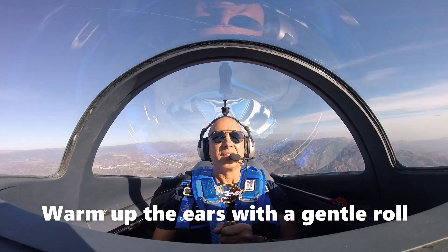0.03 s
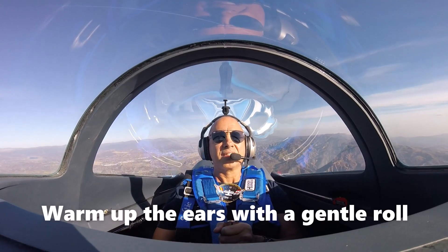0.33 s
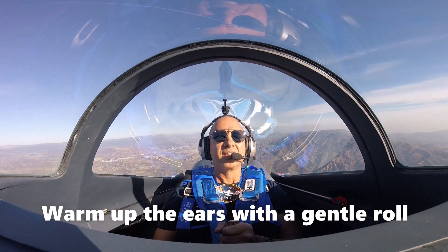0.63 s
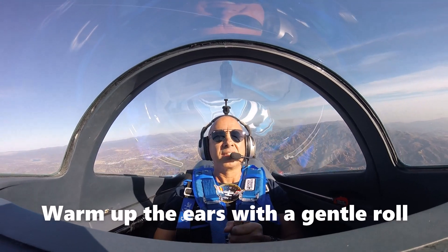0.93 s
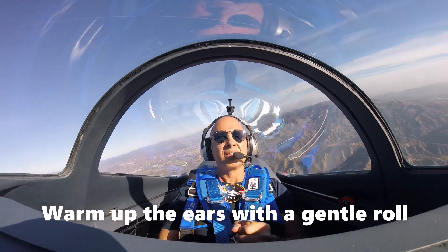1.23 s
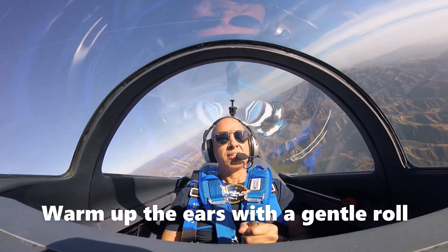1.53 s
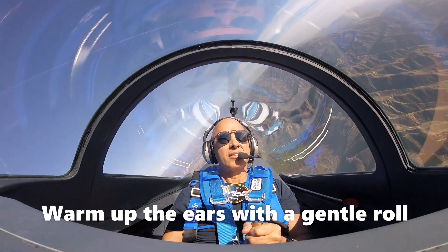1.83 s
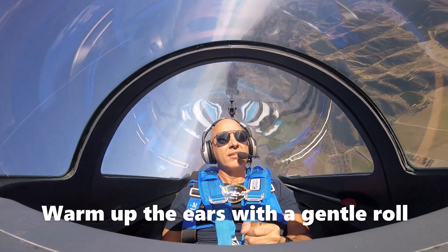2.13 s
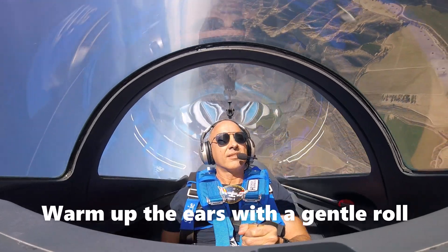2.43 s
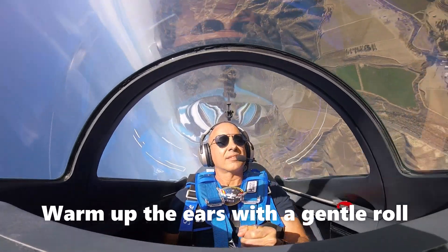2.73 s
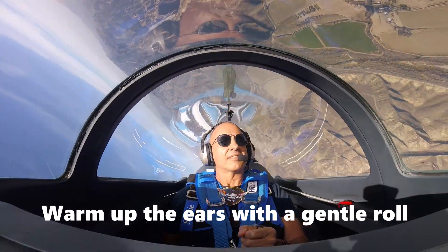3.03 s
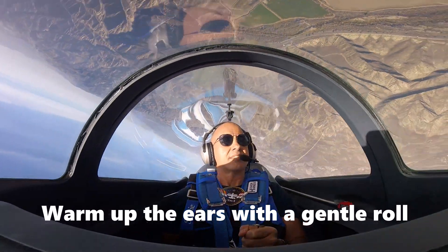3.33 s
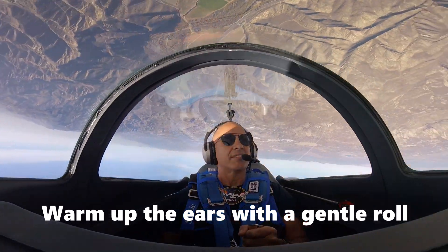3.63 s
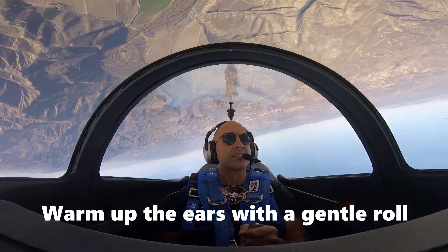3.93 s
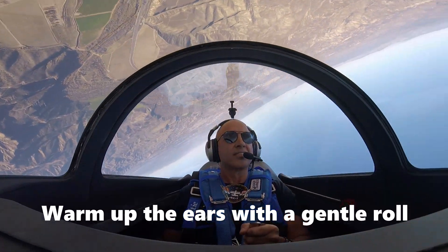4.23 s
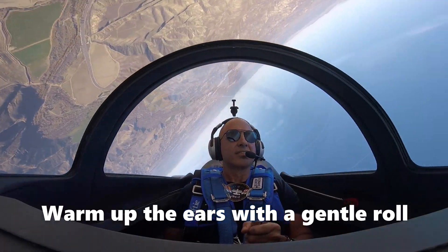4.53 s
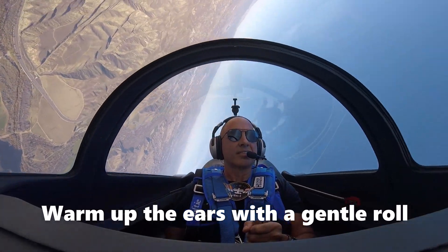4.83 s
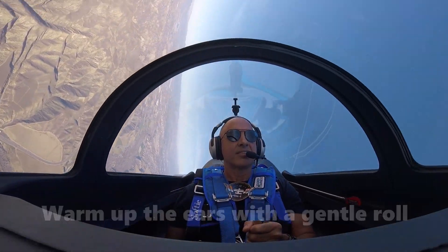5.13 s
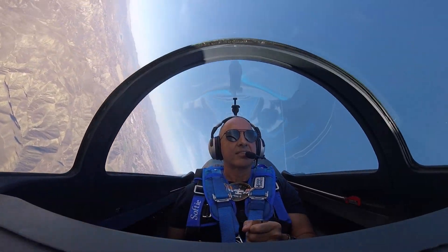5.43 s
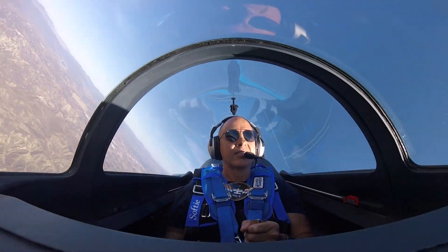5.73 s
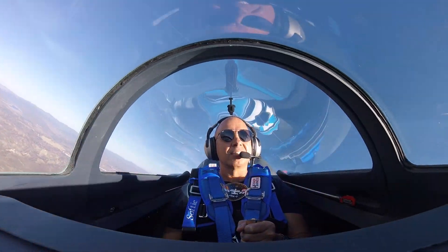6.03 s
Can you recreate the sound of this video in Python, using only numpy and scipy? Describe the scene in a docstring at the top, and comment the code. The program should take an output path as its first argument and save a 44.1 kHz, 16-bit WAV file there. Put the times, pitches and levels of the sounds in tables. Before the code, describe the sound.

Muted propeller plane drone from inside a closed cockpit jumps abruptly to full volume, with cabin rumble and rushing air.

```python
"""First comes a quiet drone, which jumps to full volume with a small click after two seconds.
This is the closed cockpit of a small aerobatic plane in a gentle roll. A six-cylinder engine and a
four-blade propeller make the drone, turning about 42 times a second. Behind them the shaken cabin
booms and air rushes over the canopy. A limiter holds down the loudest peaks."""
import sys
import numpy as np
from scipy import signal
from scipy.fft import rfft, irfft, next_fast_len
from scipy.io import wavfile
from scipy.ndimage import uniform_filter1d, minimum_filter1d

SR = 44100
rng = np.random.default_rng(int(sys.argv[2]) if len(sys.argv) > 2 else 0)


def generate_wav(sig):
    """Save sig (samples, or channels by samples) to the path in sys.argv[1] as 16-bit PCM at SR."""
    pcm = np.round(np.clip(np.atleast_2d(sig).T, -1, 1) * 32767).astype(np.int16)
    wavfile.write(sys.argv[1], SR, pcm)


N = 268569
TIME = np.arange(N) / SR
FIRINGS_PER_TURN, BLADES = 3, 4


def from_db(db):
    """Turn decibels into a number to multiply a sound by."""
    return 10 ** (np.asarray(db) / 20)


def drift(rate):
    """A smooth random wobble, about 1 in size, that changes about rate times a second."""
    step, warm_up = 100, 2000   # samples per slow step, steps thrown away
    memory = np.exp(-2 * np.pi * rate * step / SR)
    noise = rng.standard_normal(N // step + warm_up + 2)
    slow = signal.lfilter([1], [1, -2 * memory, memory ** 2], noise)[warm_up:]
    return np.interp(np.arange(N) / step, np.arange(len(slow)), slow / slow.std())


def tone(cycles, db):
    """A pure tone with an average (rms) level of db, peaking at each whole cycle."""
    return np.sqrt(2) * from_db(db) * np.cos(2 * np.pi * cycles)


# Pitches at which the cabin and canopy ring. Each row: pitch in Hz, width in Hz, boost in dB.
CABIN_RESONANCES = [(108, 26, 6.5), (299.7, 32.2, 9), (397.7, 22, 5.5), (666, 25, 3.5), (704, 17, 2),
                    (812, 22, 5.5), (883, 55, 3), (1150, 31, 1.5), (1760, 27, 1), (2770, 170, 3),
                    (3400, 130, 5.5), (3574, 130, 4), (5880, 220, 3.5), (6480, 300, 3)]
def cabin_noise(spectrum):
    """Noise shaped by a table, boosted where the cabin rings and silent above the table's last pitch."""
    size = next_fast_len(N)
    white = rfft(rng.standard_normal(size))
    hz = np.maximum(np.arange(len(white)) * SR / size, 1)
    points_hz, points_db = np.transpose(spectrum)
    db = np.interp(np.log(hz), np.log(points_hz), points_db, right=-np.inf)
    for centre, width, boost in CABIN_RESONANCES:
        db += boost / (1 + (2 * (hz - centre) / width) ** 2)
    return irfft(white * from_db(db), size)[:N] * np.sqrt(SR / 2)


# Airflow and engine clatter heard through the walls. Each row: pitch in Hz, level in dB per Hz.
AIR_SPECTRUM = [(200, -69.5), (480, -59), (640, -64), (1130, -62), (1270, -67), (1770, -67.5),
                (2020, -76.5), (2800, -81), (3200, -85.5), (4500, -89.5), (6400, -86.5), (8700, -95),
                (10300, -105.5), (12000, -121)]
def rushing_air(turns, surge, surge_db, chop, gust_db):
    """Rushing air and clatter, louder at speed and chopped a little by the engine's firings."""
    level = from_db(surge_db * surge + gust_db * drift(13))
    pulsing = 1 + chop * np.cos(2 * np.pi * FIRINGS_PER_TURN * turns)
    return level * pulsing * cabin_noise(AIR_SPECTRUM)


# The rumble of the plane's body. Each row: pitch in Hz, level in dB per Hz.
BOOM_SPECTRUM = [(12, -69), (35, -55), (70, -46), (140, -48.5), (180, -40), (225, -40.5), (265, -43),
                 (350, -48.5), (420, -55.5), (470, -67), (700, -85.5)]
def cabin_boom(turns, level_db, throb):
    """The buffeted body of the plane booms, throbbing once per engine turn."""
    pulsing = 1 + throb * np.cos(2 * np.pi * turns)
    return from_db(level_db) * pulsing * cabin_noise(BOOM_SPECTRUM)


# Weaker engine and propeller tones. Each row: cycles per engine turn, level in dB.
# The ones ending in .5 come from unequal cylinders.
WEAK_TONES = [(1.5, -33), (2, -44), (2.5, -37), (3.5, -38.5), (4.5, -38), (5.0, -32), (5.5, -29),
              (6.5, -40.5), (7.0, -30), (7.5, -33), (8.0, -32), (8.5, -41), (9.0, -41), (9.5, -38.5),
              (10.0, -39.5), (10.5, -49.5), (11, -54), (12.0, -46.5), (15.0, -52), (16, -54), (17, -53.5),
              (19.0, -48), (20, -57), (20.5, -42.5), (23.0, -47.5), (25, -50.5), (26, -52.5), (27, -58.5),
              (27.5, -56.5)]
def overtones(turns, waver_db, wander_cycles):
    """Each weaker tone reaches the cabin by its own path and wavers on its own."""
    out = np.zeros(N)
    for multiple, db in WEAK_TONES:
        shift = rng.random() + wander_cycles * drift(2)
        out += tone(multiple * turns + shift, db + waver_db * drift(1.8))
    return out


# Engine speed, sagging as the roll begins and rising as the nose drops.
# Each row: time in seconds, turns per second.
ENGINE_SPEED = [(0.0, 42.03), (2.0, 41.85), (3.9, 42.02), (4.9, 42.31), (5.6, 42.42), (6.09, 42.37)]
def crankshaft(cruise_speed, jitter_turns):
    """Count the engine's turns; uneven burning makes it run slightly ahead and behind."""
    speed = np.interp(TIME, *np.transpose(ENGINE_SPEED))
    turns = np.cumsum(speed) / SR + jitter_turns * drift(8)
    surge = speed - cruise_speed   # extra turns per second; each one adds surge_db to a sound
    return turns, surge


def propeller(turns, surge, level_db, surge_db, rough_db):
    """The blades hum loudest when their load slows the engine, and beat with the firings once a turn."""
    return tone(BLADES * turns, level_db + surge_db * surge + rough_db * drift(6))


def exhaust(turns, surge, level_db, surge_db, rough_db):
    """The firings make the main note, stronger at speed; a tone an octave up sharpens each pulse."""
    firings = FIRINGS_PER_TURN * turns
    waver_db = rough_db * drift(14)
    firing_db = level_db + surge_db * surge
    octave_db = np.interp(TIME, [0, 2.16], [-22.5, -18.5])   # starts weak and fills out
    return tone(firings, firing_db + waver_db) + tone(2 * firings, octave_db + waver_db)


def scene():
    """Air, boom and drone all follow the turning engine and mix into one channel."""
    turns, surge = crankshaft(cruise_speed=42, jitter_turns=.002)
    drone = exhaust(turns, surge, level_db=-11, surge_db=2, rough_db=.26)
    drone += propeller(turns, surge, level_db=-15.5, surge_db=-5, rough_db=.2)
    drone += overtones(turns, waver_db=1.84, wander_cycles=.07)
    boom = cabin_boom(turns, level_db=-.66, throb=.2)
    air = rushing_air(turns, surge, surge_db=1.7, chop=.05, gust_db=.41)
    return (from_db(-.01) * air + boom + drone)[None]


def limiter(x, ceiling, hold_s):
    """The volume dips smoothly around every peak that would pass the ceiling."""
    span = int(hold_s * SR)
    needed = ceiling / np.maximum(np.abs(x), ceiling)
    gain = minimum_filter1d(needed, 2 * span + 1)
    return x * uniform_filter1d(uniform_filter1d(gain, span), span)


def volume_jump(x, at_s, rise_s, quiet_db, click_db, click_s):
    """The volume starts low and is switched up at once, with a small click."""
    since = np.maximum(TIME - at_s, 0)
    gain = np.interp(since, [0, rise_s], [from_db(quiet_db), 1])
    click = from_db(click_db) * (since > 0) * np.exp(-since / click_s)
    return x * gain + click


def record(dry):
    """Hold down the peaks, switch the volume up and cut the highest treble."""
    held = limiter(dry * from_db(-.03), ceiling=.9, hold_s=.008)
    out = volume_jump(held, at_s=2.0363, rise_s=.0008, quiet_db=-18, click_db=-11.5, click_s=.0004)
    treble_cut = signal.ellip(10, .1, 80, 15700, fs=SR, output="sos")   # steep, above 15700 Hz
    return signal.sosfilt(treble_cut, out)


dry = scene()
out = record(dry)
generate_wav(out)
```